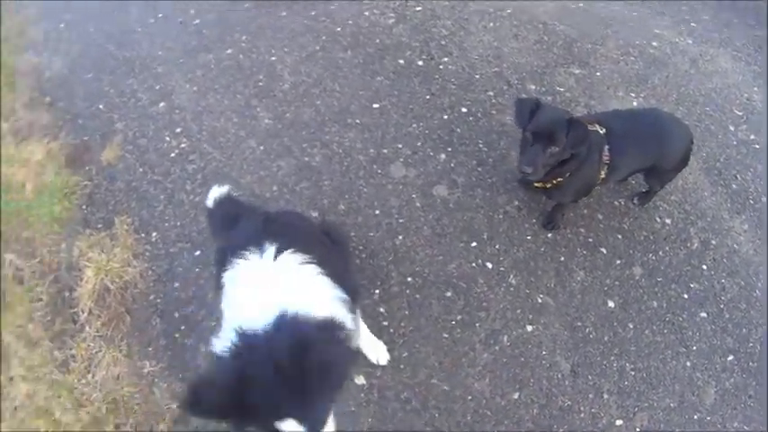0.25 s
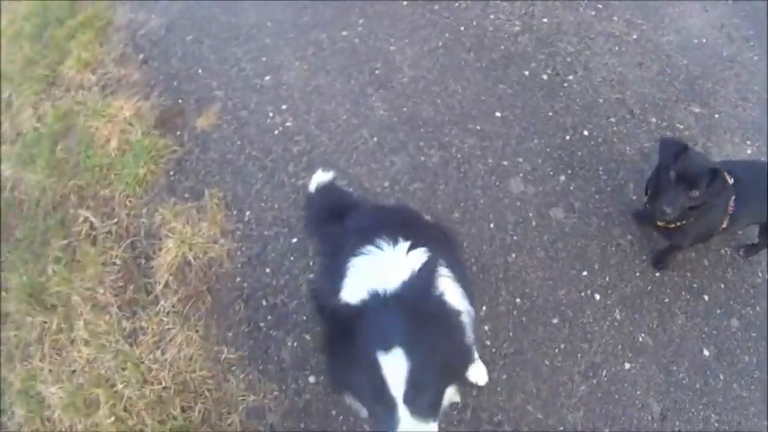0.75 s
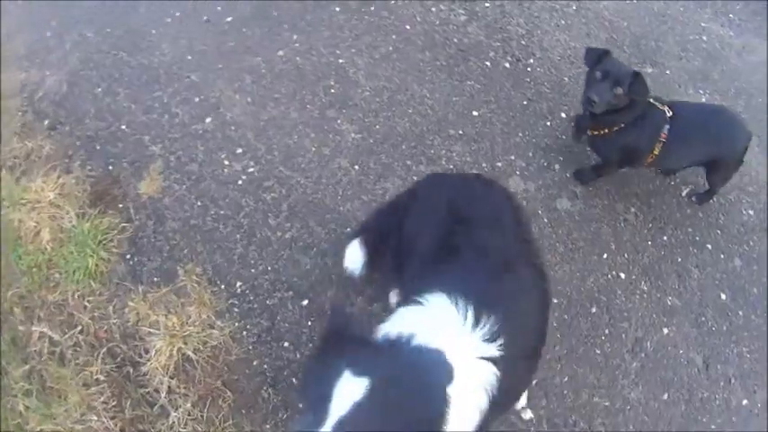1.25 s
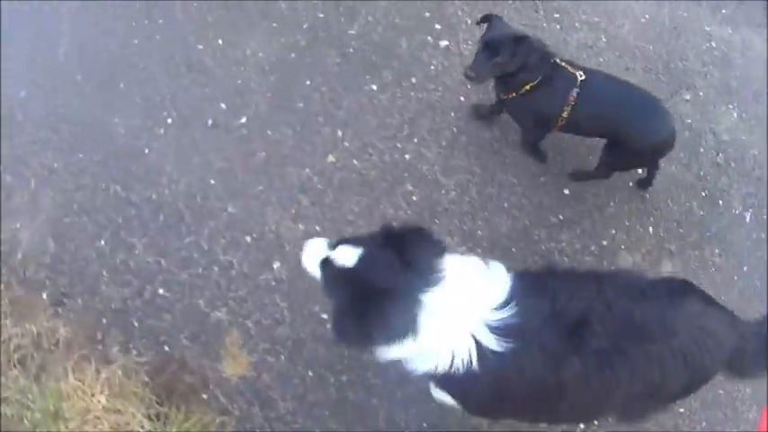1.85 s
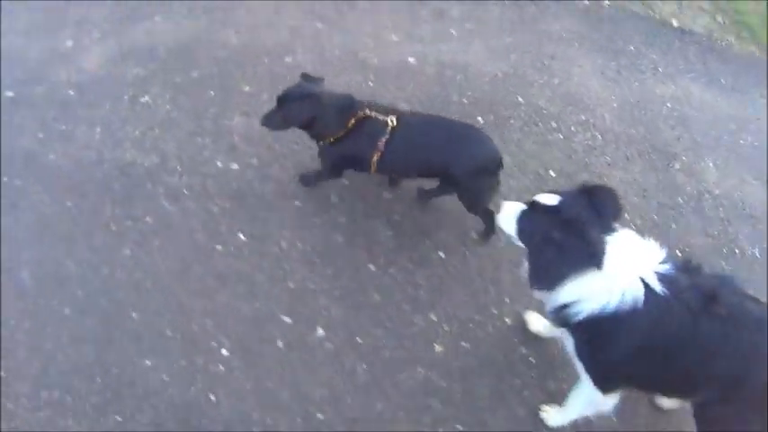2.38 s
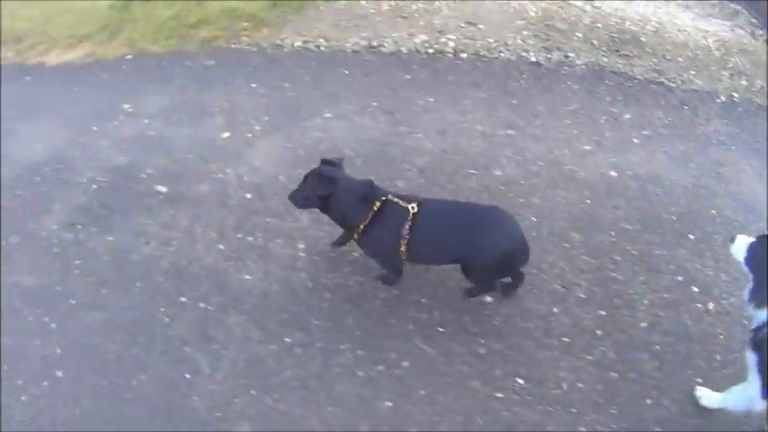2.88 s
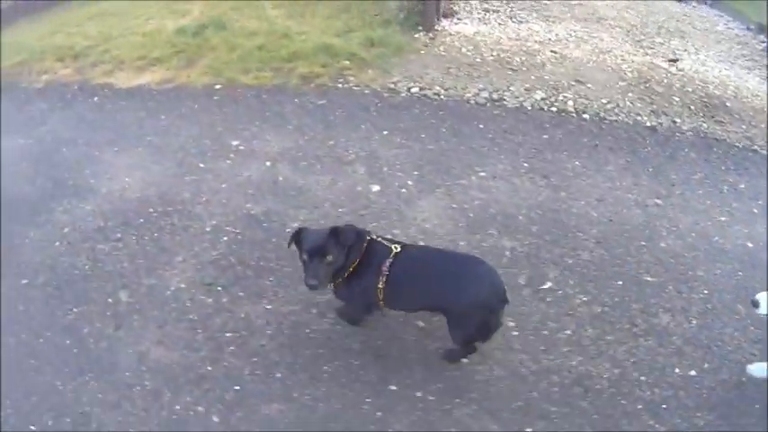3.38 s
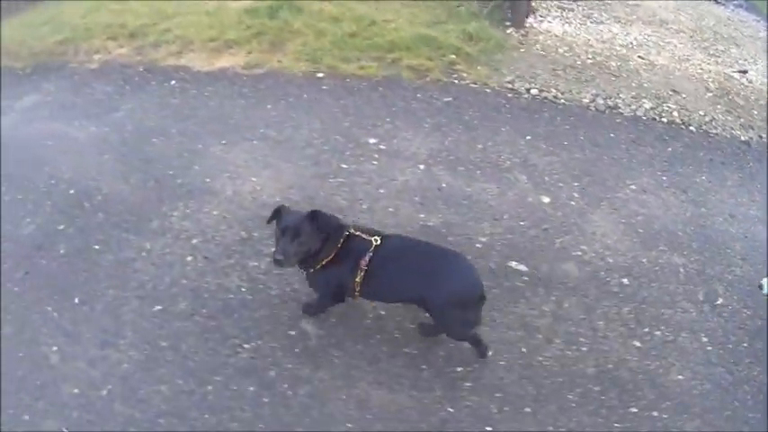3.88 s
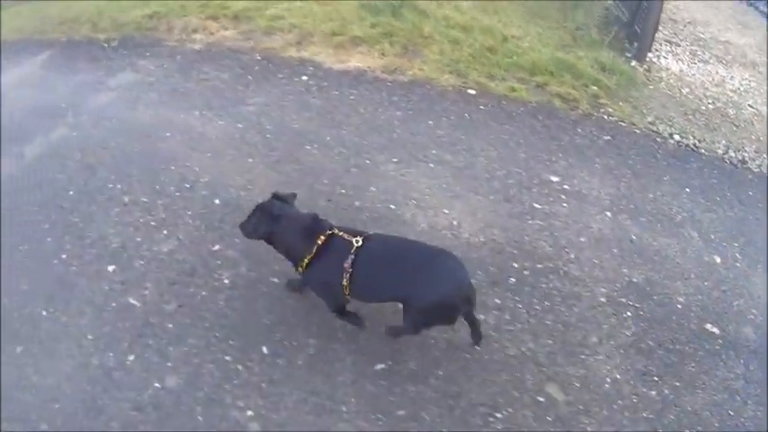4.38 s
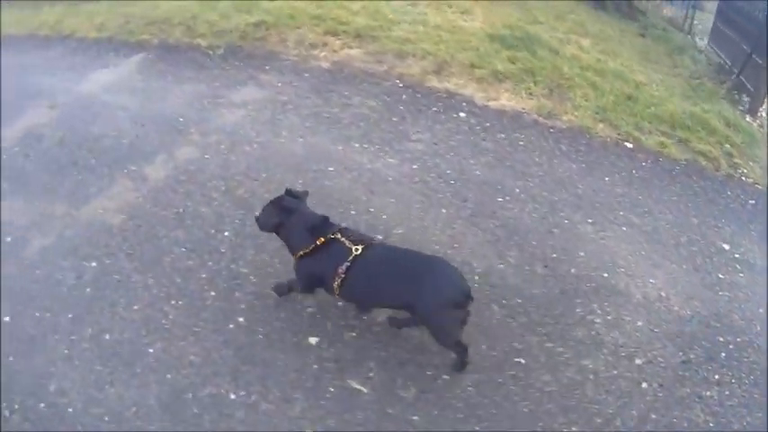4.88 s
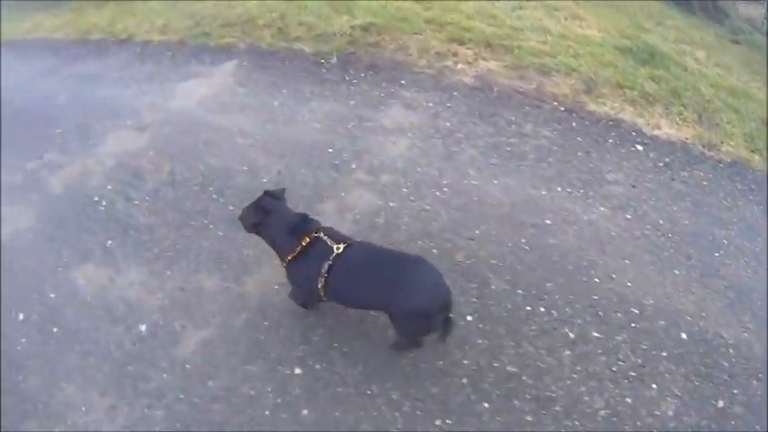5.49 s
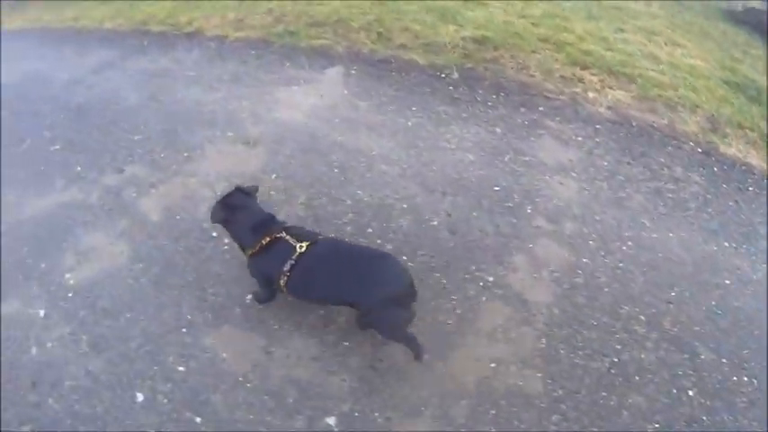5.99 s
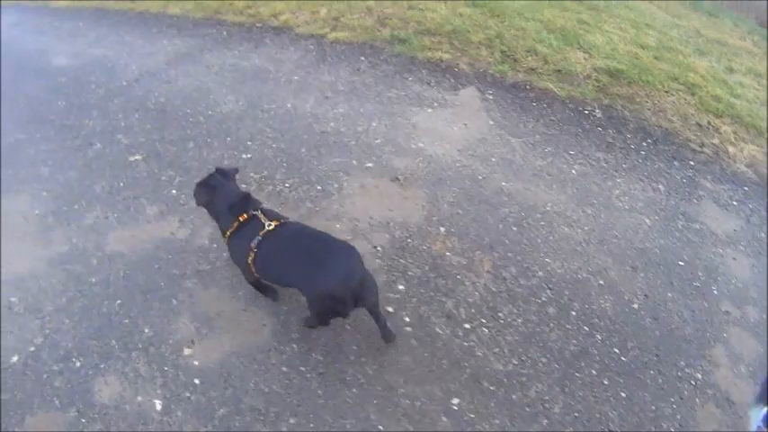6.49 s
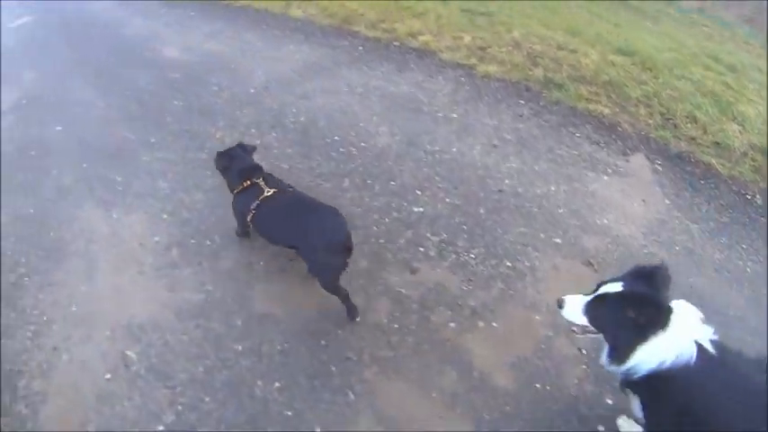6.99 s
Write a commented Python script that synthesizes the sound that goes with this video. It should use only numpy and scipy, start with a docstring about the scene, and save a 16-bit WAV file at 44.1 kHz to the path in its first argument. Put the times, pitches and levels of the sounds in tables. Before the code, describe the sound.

Very close handling noise on a small plastic camera carried along an outdoor lane. A scuff and sharp hollow knock come early, then a quieter gap, then the loudest cluster of scrape and knocks around two and a half seconds. Scattered small taps and soft scuffs follow, with a brighter clack past six seconds, over faint hiss and soft rumble.

```python
"""Knocks ring the plastic housing of a small camera carried along a lane: its air cavity sings near 1.6 kHz.
Jolts thud through the shell as rounded pushes on low and panel modes, and grains of grit tick brightly.
Hand, strap and steps scuff as gritty friction noise that rings the same housing; the strap also squeaks.
Below this, slow noise rumbles as the grip sways, and the two microphones hiss and whine faintly."""
import sys
import numpy as np
from scipy import signal
from scipy.fft import rfft, irfft, next_fast_len
from scipy.io import wavfile

SR = 44100
rng = np.random.default_rng(int(sys.argv[2]) if len(sys.argv) > 2 else 0)


def store_wav(level_fs):
    """Save 16-bit WAV to argv[1]."""
    pcm = np.round(np.clip(np.atleast_2d(level_fs), -1, 1) * 32767)
    wavfile.write(sys.argv[1], SR, pcm.T.astype(np.int16))


N = 319718  # length in samples

# Microphone hiss, shared by both sides and opposed between them: f/Hz, relative level/dB
SHARED_HISS = [(24, -13), (45, -4), (190, -6.5), (500, -12), (1000, -9.5), (1500, -17), (3100, -16),
               (4600, -14.5), (11000, -17.5), (22000, -20)]
OPPOSED_HISS = [(24, -52), (40, -22), (156, -8.5), (518, -5.5), (671, -4), (1240, -4.5), (1600, -9),
                (1720, -7), (2560, -9), (6720, -20.5), (11000, -24), (14300, -55), (22000, -120)]
SHARED_HISS_DB, OPPOSED_HISS_DB = -61.5, -59  # rms levels
WHINE_HZ, WHINE_WIDTH_HZ, WHINE_DB = 6790, 80, -75

# Steps of the walker that swing the grip: start t/s, hold/s, rumble level/dB
STEPS = [(.02, 0.049, -83), (.66, .03, -46.5), (.8, 0.079, -58.5), (1.13, .02, -59), (1.37, .02, -62),
         (1.75, 0.022, -53), (2.33, 0.24, -52.5), (2.77, .02, -56), (3.02, 0.024, -51),
         (3.55, 0.052, -57.5), (4.14, 0.067, -52.5), (4.67, 0.092, -55.5), (5.32, 0.045, -54),
         (5.84, 0.19, -60), (6.4, .03, -58), (6.48, 0.029, -47), (6.6, 0.014, -58), (6.79, .02, -65),
         (7.12, .02, -61)]
REST_DB = -69  # rumble that is always there

# Scuffs: start t/s, hold/s, level/dB, then shell/dB and bass/dB relative to that level
SCUFFS = [(0.503, 0.043, -54.5, -9, -12), (0.567, .13, -45, -3.5, -10.5), (0.707, 0.043, -59.5, 5, 0.5),
          (0.898, 0.019, -49.5, -3.5, -1), (1.048, 0.095, -54.5, -3, -5.5), (1.35, 0.031, -65, -1.5, -2.5),
          (1.63, 0.14, -59.5, -4.5, -8.5), (1.926, 0.056, -59.5, -2.5, -4), (2.216, 0.013, -60, -14, -15),
          (2.273, 0.0085, -48, -4.5, -5.5), (2.348, 0.022, -47.5, -17, -22), (2.472, 0.058, -34, -5, -12),
          (2.545, 0.008, -28.5, -7, -4), (2.585, 0.021, -47.5, -3.5, -3.5), (2.717, 0.017, -62, -5, 2.5),
          (2.98, 0.02, -59, -13, -8), (3.279, .14, -49.5, -3.5, -7.5), (3.492, 0.017, -52, -3.5, -8),
          (3.586, 0.01, -49.5, -10, -6), (3.8, 0.023, -67, -20, -25), (4.076, 0.02, -57, -7, -27),
          (4.151, 0.025, -50, -16, -16), (4.643, 0.033, -55.5, -9, -27), (4.716, 0.18, -57, -10, -15),
          (5.19, 0.091, -59, -5, -9), (5.304, 0.061, -54, -25, -21), (5.766, 0.11, -58.5, -5.5, -17),
          (5.862, 0.035, -54, -14, -23), (5.988, 0.14, -55.5, -13, -14.5), (6.265, .03, -53, -4.5, -15),
          (6.374, 0.12, -56, -21, -28), (6.74, 0.013, -62, -18, -22), (6.85, 0.017, -58.5, -15, -8),
          (7.009, 0.065, -52.5, -11, -20)]
# Light rubbing between the scuffs: t/s, level/dB
RUBBING = [(0, -66), (.45, -63), (.85, -55.5), (1.3, -66), (2.15, -61), (2.4, -58), (3.2, -59.5),
           (3.75, -59), (3.95, -64), (4.5, -61), (4.9, -63), (5.4, -58), (5.65, -64), (6.1, -63.5),
           (6.5, -57.5), (6.65, -66), (7.25, -60.5)]
# Squeaks of the strap: start t/s, hold/s, level/dB
SQUEAKS = [(.53, 0.16, -48), (.73, 0.06, -60), (5.72, 0.049, -65), (6.27, 0.017, -71)]
RUB_SHARES_DB = -4, -6.5, -9, -9, -18  # upper cavity, shell, edge, bass, squeak against the rubbing level
EDGE_DB, SQUEAK_SHARE_DB = -7, -6.5  # in a scuff, relative to the shell
UPPER_DB, UPPER_SLOPE = -5, -0.7  # upper cavity in a -60 dB scuff; its change in dB per dB of level
# Shape of each kind of burst: rise/s, fall/s, quiet level/dB
SCUFF_SHAPE, SQUEAK_SHAPE, STEP_SHAPE = (0.048, 0.037, -68.5), (0.049, 0.12, -83), (0.095, 0.12, -72)

# Bright ticks of grit: t/s, peak level/dB, f/Hz, left minus right/dB
TICKS = [(0.5776, -41, 4900, -5), (0.6066, -38, 5140, 3.5), (0.647, -35, 4900, -3), (0.654, -42, 4700, -5),
         (0.7821, -47, 5000, -3.5), (0.872, -55, 2980, 7), (1.082, -46, 2980, 0.0), (2.2463, -48, 5140, 0),
         (2.606, -41, 3100, 3.5), (3.2849, -53, 2940, 0.5), (3.336, -52, 3030, 0.0), (3.4122, -46, 3020, 2),
         (6.276, -46.5, 4540, -2), (6.28, -43, 4300, -9), (6.2974, -52, 4800, -2.0), (6.457, -53, 3110, -4),
         (7.074, -38, 5840, 1.5)]
# Jolts: t/s, low modes level/dB, panel modes/dB relative to them
THUDS = [(0.469, -63.5, 11.5), (0.6174, -24.5, -4.5), (0.668, -32, -16), (0.682, -39, -16),
         (0.699, -38, -11), (0.8874, -45.5, 0), (1.065, -46, -4.5), (1.0818, -47, -3), (1.1299, -48.5, 2),
         (1.736, -42, -11), (1.8345, -37.5, -28), (2.215, -46, -16), (2.2715, -44, 0.5), (2.547, -24.5, -6),
         (2.5544, -25.5, -32), (2.596, -45, -8), (2.693, -45, 2.5), (2.7347, -33.5, -4), (2.8483, -43, -7),
         (3.0307, -41.5, -0.5), (3.277, -48, -2), (3.3847, -47, 3), (3.4143, -42, -15), (3.5965, -49, -2),
         (4.146, -43.5, -10), (4.4295, -46, 1.5), (4.5173, -47, -17), (4.598, -47.5, -9),
         (5.303, -42.5, -31), (6.4518, -48.5, -7), (6.6378, -45.5, -12)]

# Knocks: t/s, cavity level/dB, then upper cavity/dB, shell/dB, edge/dB relative to it, contact/ms
KNOCKS = [(0.3195, -40.5, -8, -24, -24, 3.2), (.532, -47, 14, -4, -9, 0.63), (.5777, -45, -4, 9, -14, 1.3),
          (0.6122, -26, -4, -18, -19, 2), (0.6169, -11.5, -10, -9, -20.5, 0.56),
          (.666, -27.5, -3, -8, -31, 0.7), (0.6947, -40, -12, -9, -27, 0.62),
          (0.767, -37.5, -9, -17, -19, 0.71), (0.8511, -28.5, -24, -23, -21, 0.64),
          (.903, -35.5, -20, -10, -8, 2), (0.977, -40, -9, -10, -17, 0.98), (1.032, -42, -12, -7, -18, 1),
          (1.0622, -42.5, 3, 2.5, -16, .7), (1.1272, -33.5, -16, -4.5, -14, 0.45),
          (1.2452, -48, 0, -11, -19, 1.1), (1.7356, -45.5, 5, 3, -17, 1.1), (1.772, -46, -5, -15, -9, 0.64),
          (2.082, -42, 15, -0.5, -28, 0.56), (2.2143, -40.5, -8, -7, -15, .9),
          (2.2709, -27, -13, -11.5, -18, 0.43), (2.352, -40.5, 12, -1.5, -28, 2.1),
          (2.389, -35, 0, -10, -30, 0.62), (2.408, -48, 11, -4, -16, 0.81), (2.419, -42, -2, -5, -21, .64),
          (2.458, -33, -21, -2, -13, 1.4), (2.48, -19, -16, -7, -17.5, 2.1),
          (2.4923, -27, -3, -6, -23, 2.6), (2.5024, -24, -9, -9, -25, 2.1),
          (2.518, -32, -11, -13, -18, 1.6), (2.542, -19, -21, -11, -39, 1.4),
          (2.5474, -7, -13, -13, -20, 0.66), (2.553, -13, -20, -19, -23.5, 2),
          (2.597, -39, -15, -5, -17, 2.4), (2.608, -36.5, -9, -3, -14, .8), (2.6247, -47, -4, 4, -16, .7),
          (2.6917, -30, -4, -2, -45, 0.28), (2.7168, -42, -8, 2, -15, 1.5),
          (2.734, -21.5, 2, -13, -24.5, 0.22), (2.7988, -29, -9, -20, -37, 1.5),
          (2.8061, -33, 3, -20, -30, 0.2), (2.867, -41, -1, -17, -18, .9), (2.8933, -35, 1, -14, -29, .7),
          (2.9826, -35, 5.5, -8, -30, 0.65), (3.0684, -38.5, 6.5, -15, -30, 0.49),
          (3.2462, -32, -14, -24, -22, 1.8), (3.2746, -31.5, -19, -12, -22, 0.9),
          (3.2846, -38, -15, -13, -6, 1.1), (3.3202, -31.5, -21, -24, -12.5, 2.1),
          (3.3819, -26, -17, -13, -17, 1.5), (3.407, -33, -13, -11, -7.5, 1.1),
          (3.426, -40, -14, -16, -15, .9), (3.5756, -34, -4, -12, -24, 1.2),
          (3.5831, -31.5, -1, -24, -24, 1.1), (3.698, -41, 2, -10, -21, 3.2),
          (3.8119, -43, 7, -25, -24, 1.2), (3.8205, -40, 2, -21, -24, 1.1),
          (3.9831, -41.5, -12, -8, -17, 0.92), (4.1439, -35, -9, -4.5, -19, 2.5),
          (4.166, -28.5, 0.5, -16, -35, 0.9), (4.3673, -52, 15, -14, -15, 0.57),
          (4.5967, -42.5, -10, -3.5, -15, 0.41), (4.7396, -41, 2, -11, -19, 0.98),
          (4.7543, -37, 1, -17, -28, 1.2), (4.827, -38, -8, -21, -30, 1.5),
          (5.3024, -38, -16, -14, -11.5, 1.3), (5.314, -37, 0, -24, -21, 1.6),
          (5.3646, -50, 14.5, -11, -17, 0.64), (5.5571, -41, -8, -17, -23, 0.44),
          (5.6132, -43, -14, -19, -20, 1), (5.8145, -41, 0, -4, -22, 1.7),
          (5.8256, -40.5, 5, -0.5, -13, .47), (5.8746, -49.5, 14, -14, -16, .7),
          (5.889, -37, 5, -28, -25, 1.7), (6.091, -44, 2, -22, -21, 1.6),
          (6.252, -22.5, 2, -11, -13.5, 0.71), (6.2558, -34.5, -3, -7, -8, 1.5),
          (6.3547, -42.5, 9.5, -11, -12, 0.83), (6.409, -46.5, 12, 6.5, -21, 0.54),
          (6.418, -41.5, 8, -4, -23, 2.5), (6.45, -25, 8, -19, -29, 1.9),
          (6.5153, -39.5, -17, -18, -23, .9), (6.762, -46, 10, -10, -17, 0.95),
          (6.8522, -41, 2, -16, -27, 2.2), (6.9557, -41, 8, -3, -14, .6),
          (6.978, -39.5, -15, -12, -22, 1.4), (7.0423, -46.5, 14, -9, -21, .63),
          (7.0636, -26, 2.5, -16, -34, 1.15), (7.073, -49, 5, 6, 1, 0.93), (7.242, -47, -11, -18, -17, 1.3)]
KNOCK_PAN_DB, KNOCK_PAN_SPREAD_DB = -0.5, 3  # left minus right
# Faint random taps, mean and spread: level/dB above the rubbing, then the last four columns of KNOCKS
TAP_MEAN = (10, -4, -9, -14, 1.1)
TAP_SPREAD = (2.5, 6, 5, 3, .4)

# Ways the housing rings: f/Hz, width/Hz, level/dB, left minus right/dB, right ahead of left/radians
CAVITY = [(1589.4, 88.5, -3, 1.5, 0.52), (1687, 108, -5, 0.5, .4)]
UPPER = [(1944, 222, 0, 1.3, 0.58)]
SHELL = [(2630, 350, -2.5, 3, -1), (3030, 144, -3.5, -8.5, 1), (3215, 246, -5.5, 17.5, -1.5),
         (3730, 1300, -1, 13.5, -3), (4600, 146, -12, -12.5, 2.36)]
EDGE = [(5520, 540, 4, 2, 0.76), (7440, 620, -14, -9, 0.97), (7000, 790, -5.5, -4, 0.43),
        (6900, 2600, 13, -3.5, 1.47), (8740, 170, -12, -11, 0.53)]
BASS = [(137, 110, -7, 0.17, 0.47), (227, 132, -5.5, 0.55, 0.81), (358, 26, -5, 1, 2.68)]
PANEL = [(570, 160, 0, 0, 1.3), (850, 420, 6, 0, 1.3)]
SQUEAK = [(5060, 130, 0, 0, .9), (4750, 350, -1, 0, .9)]
TOP_HZ = 10950  # the recorder passes little above this

LEFT_RIGHT = np.array([[.5], [-.5]])  # splits a left-right difference evenly


def undb(db):
    """Turn decibels into an amplitude factor."""
    return 10 ** (np.asarray(db) / 20)


def unit(x):
    """Scale a sound to rms 1."""
    return x / np.sqrt(np.mean(x ** 2))


def coloured(points):
    """Noise of rms 1 whose spectrum follows (Hz, dB) points."""
    hz, db = np.transpose(points)
    n = next_fast_len(N)
    f = np.arange(n // 2 + 1) * SR / n + 1  # the 1 avoids log(0)
    shape = undb(np.interp(np.log(f), np.log(hz), db))
    white = rng.standard_normal(n)
    return unit(irfft(rfft(white) * shape, n)[:N])


def fade(x, ms):
    """Let every impulse die away exponentially with this time constant."""
    return signal.lfilter([1], [1, -np.exp(-1000 / (ms * SR))], x)


def contact_push(t, ms):
    """Force of one contact: it rises smoothly, peaks at half of ms and dies away."""
    x = t * 2000 / max(ms, .1)
    return x * np.exp(-x)


def bursts(rows, rise_s, fall_s, quiet_db):
    """Gain of events that rise from quiet, hold and fade, straight in dB; one row per dB column."""
    t = np.arange(0, N + 64, 64) / SR  # one value per 64 samples
    start, hold, *db = np.transpose(rows)[..., None]
    before = np.maximum(start - t, 0) / rise_s
    after = np.maximum(t - start - hold, 0) / fall_s
    shape_db = -(before + after) * np.maximum(db[0] - quiet_db, 5)
    power = np.sum(undb(shape_db + np.array(db)) ** 2, axis=1)
    return np.repeat(np.sqrt(power), 64, axis=1)[:, :N]


def ring(force, modes, low_hz=0):
    """A force rings each mode; two microphones hear it with their own gain and phase."""
    if low_hz:  # little passes below this
        force = signal.sosfilt(signal.butter(4, low_hz, "high", fs=SR, output="sos"), force)
    out = 0
    for hz, width, db, pan_db, lead in modes:
        pole = np.exp((2j * hz - width) * np.pi / SR)  # a wider mode dies sooner
        swing = signal.lfilter([1], [1, -pole], force)
        heard = np.imag(swing * np.exp(-1j * lead * LEFT_RIGHT))
        out = out + undb(db + pan_db * LEFT_RIGHT) * heard
    return out


def housing(cavity, upper, shell, edge):
    """The four upper families of modes each ring under their own force."""
    return [ring(cavity, CAVITY, 1300), ring(upper, UPPER, 1700),
            ring(shell, SHELL, 2500), ring(edge, EDGE, 4800)]


def hiss():
    """Steady microphone noise, with a thin wavering whine opposed left and right."""
    whine = unit(ring(rng.standard_normal(N), [(WHINE_HZ, WHINE_WIDTH_HZ, 0, 0, 0)])[0])
    shared = undb(SHARED_HISS_DB) * coloured(SHARED_HISS)
    opposed = undb(OPPOSED_HISS_DB) * coloured(OPPOSED_HISS) + undb(WHINE_DB) * whine
    return shared + opposed * np.array([[1], [-1]])


def sway():
    """The moving grip flexes the housing: slow pressure swings, alike in both microphones."""
    gain = np.hypot(undb(REST_DB), bursts(STEPS, *STEP_SHAPE)[0])
    return gain * coloured([(3, 7.5), (14, 2.0), (45, -4), (110, -35.0), (400, -60)])


def grit(rate_hz, spread_db, smooth, slip_ms):
    """Friction noise of rms 1: short slips of uneven size over a smoother rubbing force."""
    sizes = undb(spread_db * rng.standard_normal(N))
    starts = (rng.random(N) < rate_hz / SR) * sizes
    strength = unit(fade(starts, slip_ms)) + smooth
    return unit(strength * rng.standard_normal(N))


def pressure():
    """Gain of cavity, upper cavity, shell, edge, bass and squeak under scuffs and light rubbing."""
    s, hold, db, shell_db, bass_db = np.transpose(SCUFFS)
    upper_db = UPPER_DB + UPPER_SLOPE * (db + 60)
    shares_db = np.c_[0 * db, upper_db, shell_db, shell_db + EDGE_DB, bass_db, shell_db + SQUEAK_SHARE_DB]
    gain = bursts(np.c_[s, hold, db[:, None] + shares_db], *SCUFF_SHAPE)
    gain[-1] = np.hypot(gain[-1], bursts(SQUEAKS, *SQUEAK_SHAPE)[0])
    rub_db = np.interp(np.arange(N) / SR, *np.transpose(RUBBING))
    return np.hypot(gain, undb(rub_db + np.r_[0, RUB_SHARES_DB][:, None]))


def scuff(apart=0.76, bass_apart=0.54, panel_db=-4):
    """Gritty friction rings the whole housing; part of the force reaches each microphone alone."""
    force = grit(260, 4.0, 1.04, 2.9)
    alone = np.array([grit(330, 1.7, 1.0, 0.8) for _ in range(2)])
    near = force + apart * alone
    deep = force + bass_apart * alone
    upper_families = [unit(sound) for sound in housing(force, force, near, near)]
    bass = unit(ring(deep, BASS)) - undb(panel_db) * unit(ring(deep, PANEL, 220))
    squeak = unit(ring(grit(300, 4.0, 0.76, 3.8), SQUEAK, 4100))
    sounds = upper_families + [bass, squeak]
    return sum(gain * sound for gain, sound in zip(pressure(), sounds))


def ticks(cycles=4.3, lead=0.65):
    """A grain of grit rings briefly, swelling for a few cycles and dying away; the right leads."""
    out = np.zeros((2, N + 512))
    t = np.arange(512) / SR
    for s, db, hz, pan_db in TICKS:
        x = hz * t / cycles
        swell = np.e * x * np.exp(-x)  # peaks at 1
        tone = np.sin(2 * np.pi * hz * t - lead * LEFT_RIGHT)
        i = int(s * SR)
        out[:, i:i + 512] += undb(db + pan_db * LEFT_RIGHT) * swell * tone
    return out[:, :N]


def thuds(push_ms=.2, shake_ms=8., shake=.05):
    """A jolt is a rounded push, then a short ragged shake; the panels swing against the low modes."""
    s, low_db, panel_db = np.transpose(THUDS)
    jolts = np.zeros((2, N))
    jolts[:, (s * SR).astype(int)] = undb([low_db, low_db + panel_db])
    shaking = shake * fade(jolts, shake_ms) * rng.standard_normal(N)
    push = contact_push(np.arange(256) / SR, push_ms)
    low, panel = signal.lfilter(push / push.sum(), [1], jolts + shaking)
    return ring(low, BASS) - ring(panel, PANEL, 200)


def knocks(rattle=1.0, count=70):
    """While a contact lasts it pumps the cavity at its own pitch and rattles shell and edge."""
    t = np.arange(512) / SR
    taps = np.c_[rng.random(count) * N / SR, TAP_MEAN + TAP_SPREAD * rng.standard_normal((count, 5))]
    taps[:, 1] += np.interp(taps[:, 0], *np.transpose(RUBBING))
    pump = np.cos(2 * np.pi * np.array([[CAVITY[0][0]], [UPPER[0][0]]]) * t)
    forces = np.zeros((4, 2, N + 512))  # family, microphone, time
    for s, db, upper_db, shell_db, edge_db, ms in np.vstack([taps, KNOCKS]):
        noise = rng.standard_normal((4, 512))
        contact = contact_push(t, ms)
        swell = 2 * contact / contact.sum() * (pump + rattle * noise[:2])
        crack = contact / np.sqrt(np.sum(contact ** 2)) * noise[2:]
        pan_db = KNOCK_PAN_DB + KNOCK_PAN_SPREAD_DB * rng.standard_normal()
        family_db = np.array([[0], [upper_db], [shell_db], [edge_db]])
        size = undb(db + family_db + pan_db * LEFT_RIGHT.T)
        i = int(s * SR)
        forces[..., i:i + 512] += size[..., None] * np.vstack([swell, crack])[:, None]
    return sum(housing(*forces[..., :N]))


def scene():
    """All layers together, from the background to the knocks."""
    return hiss() + sway() + scuff() + ticks() + thuds() + knocks()


def record(dry):
    """The recorder cuts the top steeply."""
    return signal.sosfilt(signal.ellip(10, .2, 70, TOP_HZ, fs=SR, output="sos"), dry)


dry = scene()
out = record(dry)
store_wav(out)
```